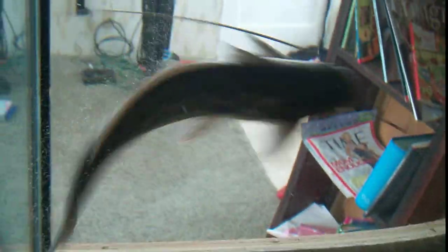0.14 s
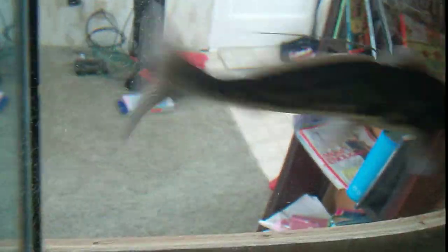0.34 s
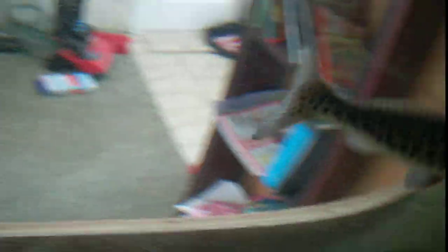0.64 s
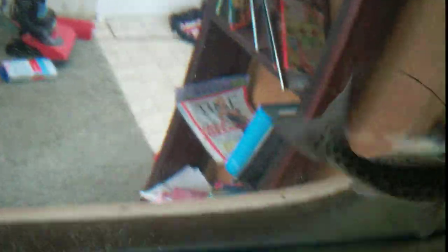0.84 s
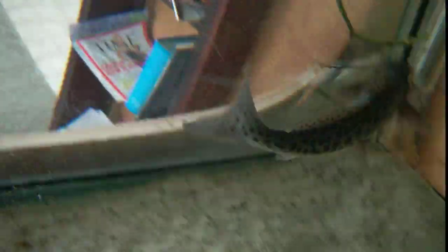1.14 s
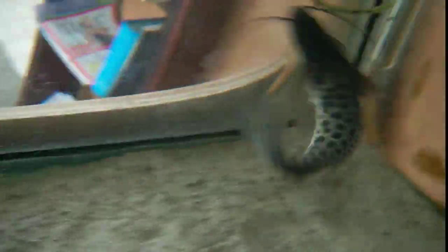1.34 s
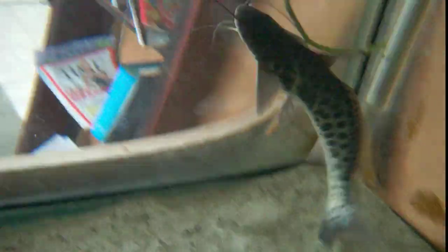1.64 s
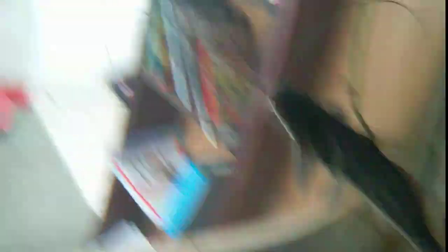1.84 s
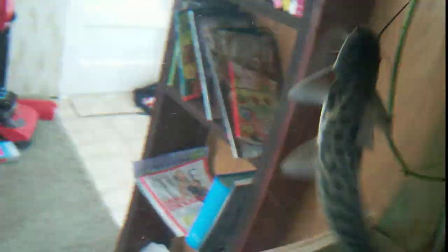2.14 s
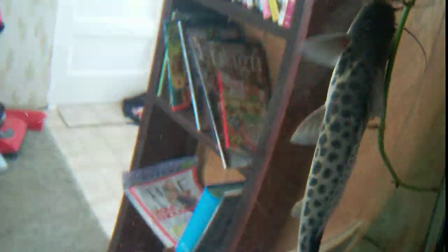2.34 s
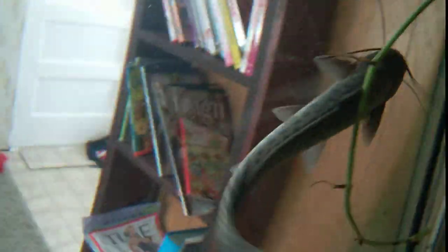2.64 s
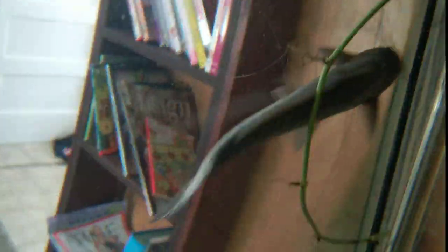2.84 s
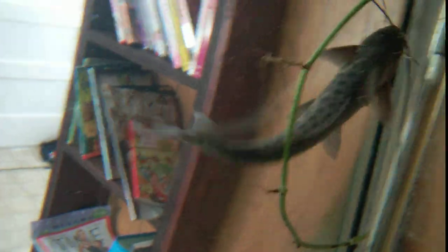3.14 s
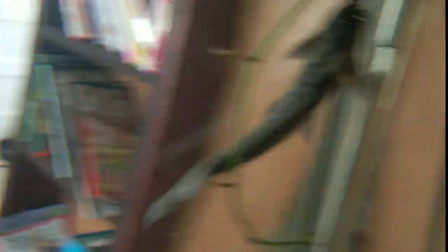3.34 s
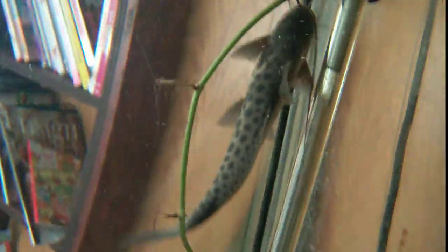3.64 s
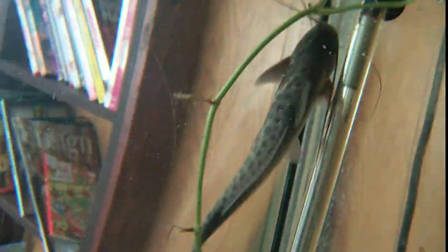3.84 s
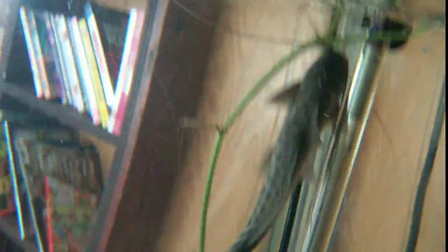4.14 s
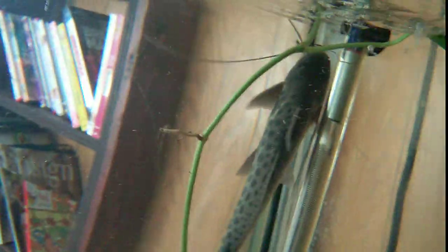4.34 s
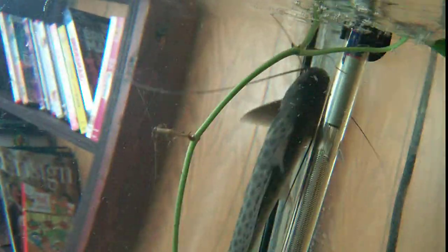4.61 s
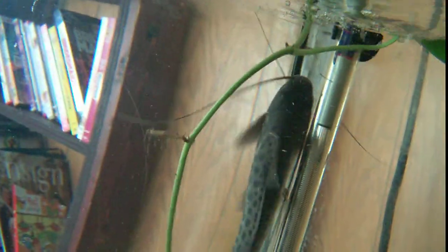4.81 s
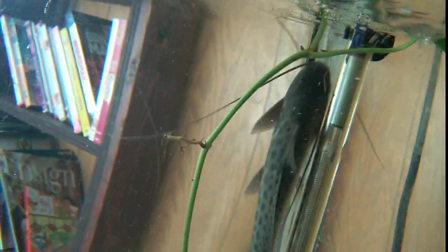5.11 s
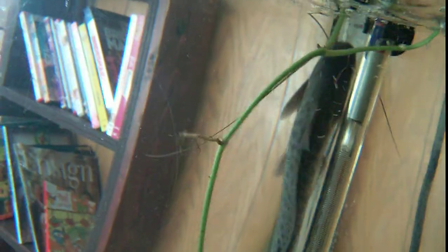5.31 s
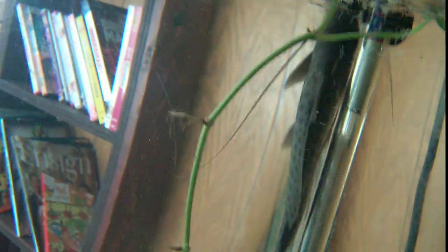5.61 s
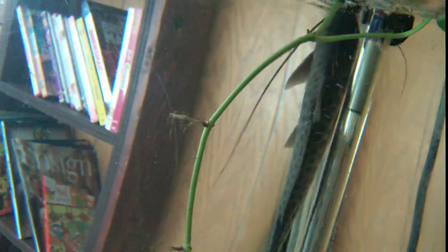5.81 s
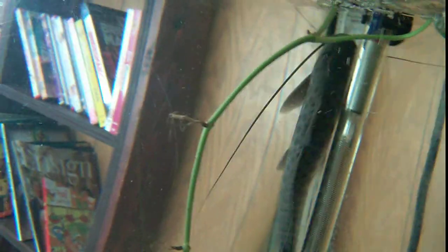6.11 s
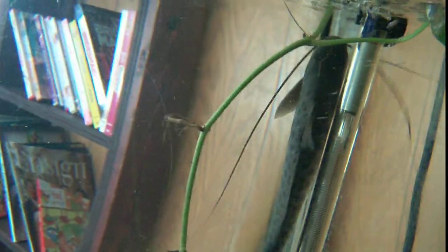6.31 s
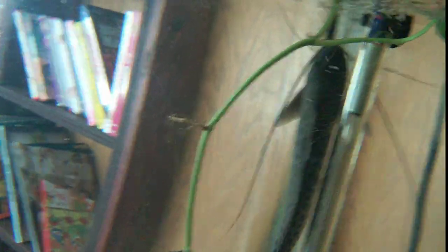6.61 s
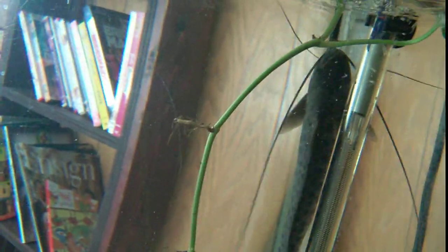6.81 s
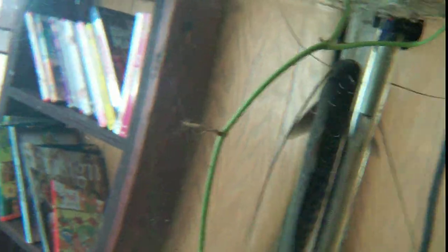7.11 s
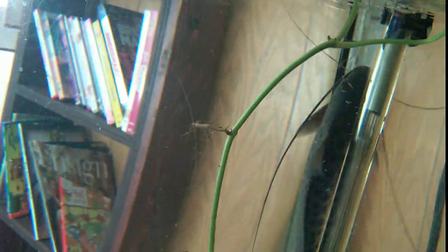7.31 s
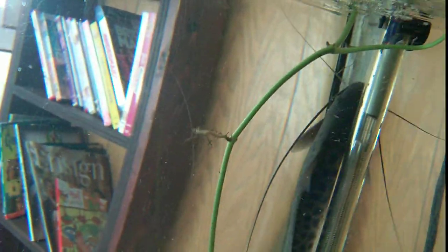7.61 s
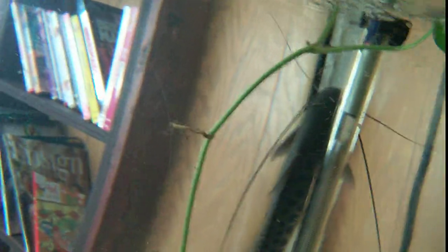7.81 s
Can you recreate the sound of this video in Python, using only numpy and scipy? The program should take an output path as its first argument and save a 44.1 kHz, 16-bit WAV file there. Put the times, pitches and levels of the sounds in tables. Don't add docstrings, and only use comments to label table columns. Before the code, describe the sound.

Heard from a sealed microphone under water in a home aquarium: a loud low mains hum and churning pump water open close by, with resonant glugs and glassy bubble notes. Muffled knocks and low sloshing cluster around one to three seconds. The pump then recedes to a softer hum, leaving sparse plinks and ticks over steady hiss and a thin electronic whine.

```python
import sys
import numpy as np
from scipy import signal
from scipy.fft import rfft, irfft, next_fast_len
from scipy.io import wavfile
from scipy.ndimage import uniform_filter1d

SR = 44100
rng = np.random.default_rng(int(sys.argv[2]) if len(sys.argv) > 2 else 0)


def volts_from_db(level):
    exponent = np.asarray(level, float) / 20
    return 10 ** exponent


def log_audio(samples):
    frames = np.atleast_2d(samples).T
    limited = np.clip(frames, -1, 1)
    pcm = np.round(limited * 32767).astype(np.int16)
    wavfile.write(sys.argv[1], SR, pcm)


N = 351032
TIME = np.arange(N) / SR


def unit(x):
    return x / np.sqrt(np.mean(x ** 2))


def noise(gain_at):
    size = next_fast_len(N)
    hz = np.fft.rfftfreq(size, 1 / SR) + 1e-3
    spectrum = rfft(rng.standard_normal(size)) * gain_at(hz)
    return unit(irfft(spectrum, size)[:N])


def colour(points):
    hz, db = np.transpose(points)
    return lambda f: volts_from_db(np.interp(np.log(f), np.log(hz), db))


def resonances(peaks):
    def gain_at(f):
        power = 0
        for hz, width, db in peaks:
            detuning = (f - hz * hz / f) / width
            power = power + (volts_from_db(db) / (1 + detuning ** 2) ** 0.9) ** 2
        return np.sqrt(power)
    return gain_at


def walk(rate):
    hold = int(SR / rate)
    levels = np.repeat(rng.standard_normal(N // hold + 1), hold)
    slewed = uniform_filter1d(uniform_filter1d(levels, hold), hold)
    return unit(slewed[:N])


def add(out, s, x):
    i = int(round(s * SR))
    out[i:i + len(x)] += x[:N - i]


def preamp_hiss():
    # frequency in Hz, level in dB per Hz.
    hiss_density = [(150, -13), (400, 11), (700, 5), (1360, 4), (2500, 1.5), (4500, -1), (8140, -3.5),
                    (17000, -6.5)]
    return volts_from_db(-41.5) * noise(colour(hiss_density))


def sensor_whine():
    scan_hz, gate_hz = 1966.782, 14.994
    # multiple, level in dB rms.
    scan_lines = [(1, -65), (2, -64), (3, -66), (4, -60), (5, -78), (6, -78), (7, -71), (8, -68)]
    gate = 1 + 0.56 * np.clip(3 * np.cos(2 * np.pi * (gate_hz * TIME + 0.13)), -1, 1)
    whine = np.zeros(N)
    for k, db in scan_lines:
        line = volts_from_db(db) * np.sin(2 * np.pi * k * scan_hz * TIME + k)
        whine += line * gate if k == 4 else line
    return np.sqrt(2) * whine


def slosh():
    # frequency in Hz, level in dB per Hz.
    eddy_density = [(3, -11), (9, 5.5), (25, 2.5), (45, -5.5), (70, -13), (100, -16.5), (200, -75),
                    (500, -100)]
    # time in seconds, slosh level in dB.
    sweep = [(0, -19), (.4, -18), (1.15, -20.5), (1.33, -27), (1.75, -13.5), (1.95, -17.5), (2.35, -15.5),
             (2.81, -18), (3.15, -20.5), (3.3, -16.5), (3.74, -16), (4.41, -24.5), (5.08, -22),
             (5.58, -21.5), (5.96, -23.5), (7.03, -23.5), (7.71, -20), (7.96, -21)]
    sweep_db = np.interp(TIME, *np.transpose(sweep))
    return volts_from_db(sweep_db + 1.82 * walk(5)) * noise(colour(eddy_density))


def knocks():
    # time of the peak in seconds, level in dB, push in ms.
    presses = [(1.5249, -10, 3.9), (1.5978, -16, 2.4), (1.8217, 0.5, 2.64), (1.8247, -15, 2.3),
               (1.917, -7.5, 4.1), (2.0849, -6.5, 3.8), (2.3735, -11, 2.3), (2.787, -12, 3.8),
               (2.7911, -21, 2.1), (4.008, -12.5, 2.6), (4.5082, -19.5, 3.24), (5.321, -24, 2.5),
               (6.33, -21, 2.7), (6.336, -21, 3.3), (6.34, -24, 2.1), (7.3075, -34, 1.4)]
    # time of the peak in seconds, level in dB, push in ms.
    tugs = [
        (1.3517, -3, 3.9),
        (3.3146, -18, 2.6),
        (5.7921, -30, 1.1),
        (6.4854, -25, 1.9),
    ]
    out, t = np.zeros(N), np.arange(1500) / SR
    for direction, rows in ((-0.78, presses), (0.71, tugs)):
        for s, db, push_ms in rows:
            u = t * 1000 / push_ms - 1
            rebound = 0.068 - 0.07 * db
            push = np.exp(-np.abs(u / np.where(u < 0, 0.22, 0.36)) ** 1.4)
            wobble = np.sin(np.pi * np.maximum(u - 0.3, 0)) * np.exp(-np.maximum(u - 0.8, 0))
            add(out, s - push_ms / 1000, direction * volts_from_db(db) * (push - rebound * wobble))
    return out


def tank_response(t):
    # frequency in Hz, level in dB, decay time t60 in seconds.
    low_modes = [(518, 11.5, 0.064), (711, 8, 0.086), (792, -3, 0.15), (890, -0.5, 0.069),
                 (1100, 3.5, 0.093), (1320, 7, 0.051), (1488, 5, 0.071), (1631, 7, 0.043),
                 (1775, -1, 0.057), (1920, -18, 0.083), (2160, 6, 0.05), (2400, 7, 0.043),
                 (2580, -4, 0.04), (2770, -4, 0.063)]
    # frequency in Hz, level in dB, decay time t60 in seconds.
    high_modes = [(2945, -4, 0.027), (3145, 4.5, 0.032), (3410, -1.5, 0.047), (3780, 2.5, 0.036),
                  (3980, 5.5, 0.024), (4320, 5.5, 0.021), (4560, -0.5, 0.036), (4860, -12, 0.041),
                  (5070, 7, 0.026), (5660, 0, 0.025), (5880, 6, 0.019), (6050, -3, 0.016), (6360, 3, 0.02)]
    response = np.zeros(len(t))
    for k, (hz, db, t60) in enumerate(list(low_modes) + list(high_modes)):
        sign = (-1) ** (k * (hz < 2500))
        response += sign * volts_from_db(db) * np.sin(2 * np.pi * hz * t) * 1000.0 ** (-t / t60)
    return response


def fizz():
    per_s, floor_db, spread_db = 60, -60.5, 4
    draws = rng.random((int(per_s * N / SR), 3))
    return [(a * N / SR, floor_db - spread_db * np.log(1 - 0.98 * b), 1800 * 3.54 ** c, 12)
            for a, b, c in draws]


def bubble_events():
    # time in seconds, peak level in dB, pitch in Hz.
    glugs = [(.001, -26, 1340), (.159, -18, 740), (.249, -24.5, 1360), (.514, -21.5, 1060),
             (.62, -38, 1080), (.683, -28.5, 970), (1.512, -33.5, 1300), (1.74, -39, 1160),
             (1.939, -30, 655), (1.963, -31, 711), (2.596, -26.5, 710), (3.448, -40, 1310),
             (3.491, -37, 1070), (4.494, -36, 1190), (5.477, -32, 690), (5.889, -33, 604),
             (6.483, -36, 665), (7.045, -35, 960)]
    # time in seconds, peak level in dB, pitch in Hz.
    plinks = [(.713, -35, 2910), (.874, -31, 3180), (1.326, -25, 2600), (1.361, -32, 3100),
              (1.509, -19, 2770), (1.657, -18.5, 2800), (1.89, -38, 2260), (1.924, -35, 2090),
              (2.2, -32, 2200), (2.654, -28, 2940), (3.238, -33.5, 2700), (3.388, -35, 3600),
              (3.424, -37, 2320), (3.821, -24, 2900), (4.144, -29.5, 3600), (4.474, -30.5, 2900),
              (4.756, -28.5, 2400), (5.193, -29, 2140), (5.371, -30, 2160), (5.456, -34, 2600),
              (5.628, -28, 3150), (5.754, -26, 2150), (6.399, -25.5, 2160), (6.424, -32, 2750),
              (6.595, -28.5, 2880), (6.996, -34, 3260), (7.113, -36, 1920), (7.453, -38, 2220),
              (7.734, -32, 2760), (7.365, -38, 2180)]
    # time in seconds, peak level in dB, pitch in Hz.
    chimes = [(.289, -39, 2080), (.354, -14, 1665), (.732, -38, 1770), (.774, -34, 2440), (.955, -37, 2470),
              (1.325, -27, 3145), (1.362, -14.5, 2334), (1.938, -37, 3020), (1.972, -33.5, 3710),
              (2.088, -37, 2530), (2.135, -22, 2305), (2.476, -37, 3300), (2.778, -22, 2210),
              (3.556, -33.5, 2840), (3.708, -32.5, 2380), (4.023, -23.5, 3490), (4.404, -38, 1775),
              (4.607, -35, 3070), (4.876, -36, 3070), (6.16, -33.5, 2390), (6.315, -25, 3170),
              (7.162, -35, 2880), (7.189, -35, 2570), (7.525, -38, 2890), (7.86, -35, 2260),
              (1.06, -39, 6500), (2.823, -39, 4250), (4.007, -43, 2700), (4.625, -40, 1410),
              (6.842, -39, 5360)]
    # time in seconds, peak level in dB, pitch in Hz.
    ticks = [(.6, -35, 4430), (.659, -29, 4560), (1.525, -25.5, 5940), (2.036, -36, 6050),
             (2.29, -30, 5900), (3.106, -34, 5800), (3.159, -30.5, 3780), (3.276, -33, 4900),
             (3.461, -30.5, 5440), (3.928, -36, 4530), (3.944, -25, 4100), (4.007, -36, 6250),
             (4.007, -35, 4250), (4.109, -34, 4900), (4.206, -35, 4240), (4.506, -35, 5800),
             (4.727, -31, 5960), (4.998, -35, 5900), (5.974, -35, 6330), (6.043, -38, 4490),
             (6.045, -37, 6200), (6.14, -40, 4550), (6.225, -26.5, 6100), (6.996, -35, 4700),
             (7.088, -38, 5170), (7.114, -28, 5300), (7.62, -35, 5880), (7.647, -34, 3820),
             (6.554, -39, 5070), (7.188, -40, 5090)]
    # time in seconds, peak in dB, pitch in Hz, cycles of ring.
    pops = [(.353, -13.5, 810, 1.3), (.354, -24.5, 2550, 3.2), (.468, -25, 725, 2.8),
            (.468, -30, 1780, 2.9), (.998, -26, 1450, 3.6), (1.765, -23, 5500, 3.9),
            (1.821, -39, 1000, 1.5), (1.962, -25.5, 1140, 0.67), (2.092, -34, 910, 1.4),
            (2.29, -32, 3690, 3.7), (2.55, -30, 620, 3.1), (3.314, -39, 930, 1.4), (3.694, -32, 880, 4.8),
            (4.007, -26.5, 1350, .7), (4.571, -29.5, 1100, 1.6), (4.935, -30, 5200, 4.2),
            (5.048, -29.5, 2820, 3.7), (6.105, -28.5, 1940, 3.3), (6.328, -29, 1320, 1.1),
            (6.829, -36, 1600, 1.7)]
    # time in seconds, peak in dB, pitch in Hz,
    # cycles of ring.
    pings = [(0.003, -28, 2350, 5), (0.16, -17, 880, 9), (0.356, -24, 1085, 6), (0.47, -25, 2350, 7),
             (0.471, -23, 1680, 8), (0.633, -7.5, 770, 11), (1.51, -27, 2400, 12), (1.671, -36, 4700, 12),
             (4.404, -30, 2160, 10), (4.93, -37, 3900, 6), (5.195, -34, 2430, 20), (5.298, -39, 2180, 18),
             (5.485, -37, 711, 20), (5.649, -40, 3750, 18), (5.754, -31, 2830, 14), (5.755, -26, 2420, 25),
             (6.223, -40, 3170, 20), (6.335, -38, 3850, 14), (6.495, -35, 711, 22), (6.553, -36, 5900, 16),
             (6.593, -35, 3145, 16), (7.677, -40, 6410, 20), (7.735, -34, 2400, 18)]
    events = list(pops) + list(pings) + fizz()
    for rows, cycles in ((glugs, 9.4), (plinks, 12.4), (chimes, 36), (ticks, 15.3)):
        events += [(*row, cycles) for row in rows]
    return events


def bubbles():
    size = 8192
    t = np.arange(size) / SR
    tank, out = rfft(tank_response(t)), np.zeros(N)
    for s, db, hz, cycles in bubble_events():
        decay = np.exp(-np.pi * hz * t / (0.76 * cycles))
        onset = 1 - np.exp(-t * hz / 1.95)
        ring = np.sin(2 * np.pi * hz * t) * decay * onset
        direct = volts_from_db(22) / cycles
        heard = irfft(rfft(ring) * (tank + direct))[:size // 2]
        add(out, max(s - 1.4 / hz, 0), heard * volts_from_db(db) / np.abs(heard).max())
    return out


def motor_hum(near_db):
    mains_hz, rest_db = 60.01, -31.5
    lag = 1.2
    # multiple, level in dB, extra level when close in dB.
    mains_lines = [(1, -0.5, -3), (2, 0, 0), (3, -10, 5), (4, -16, 3.5), (5, -23, -3), (6, -21, -13),
                   (8, -60, -18)]
    gain_db = 0.92 * near_db
    close = np.clip(gain_db / 10, 0, 1)
    hum = np.zeros(N)
    for k, db, extra_db in mains_lines:
        level = volts_from_db(db + extra_db * close + 1.3 * walk(2.216))
        hum += level * np.cos(2 * np.pi * k * mains_hz * TIME + lag * k * k)
    return -np.sqrt(2) * volts_from_db(rest_db + gain_db) * hum


def churned_water(near_db):
    # frequency in Hz, width in Hz, level in dB.
    low_casing = [(140.7, 21, 3), (155.6, 74, -4), (223, 115, -10), (288, 50, -4), (329, 65, -10.5)]
    # frequency in Hz, width in Hz, level in dB.
    high_casing = [(444.4, 31, 3), (500, 28, 1), (565, 70, -3), (642, 33, -0.5), (716, 29, -4.5),
                   (813, 86, -12.5), (1000, 200, -16.5)]
    low = volts_from_db(-35.5 + near_db + 1.3 * walk(10)) * noise(resonances(low_casing))
    high = volts_from_db(-50 + 1.61 * near_db + 1.6 * walk(18)) * noise(resonances(high_casing))
    return low + high


def pump():
    # time in seconds, nearness in dB.
    nearness = [(0, 10.5), (.4, 11), (.73, 8), (1.1, 3.5), (1.33, 5), (1.9, 3.5), (2.35, 3.5), (3.0, -1),
                (3.6, 0), (4.4, -1.5), (5.1, -2), (5.7, -0.5), (6.2, -1), (6.7, -0.5), (7.1, -1.5),
                (7.6, 1), (7.96, 0)]
    near_db = np.interp(TIME, *np.transpose(nearness))
    return motor_hum(near_db) + churned_water(near_db)


def scene():
    circuits = preamp_hiss() + sensor_whine()
    return (circuits + slosh() + knocks() + bubbles() + pump())[None]


def band_limit(x):
    return signal.sosfilt(signal.butter(12, 16880, fs=SR, output="sos"), x)


def record(dry):
    low_pass = signal.ellip(10, 0.1, 60, 15790, fs=SR, output="sos")
    cut = signal.sosfilt(low_pass, dry)
    return band_limit(cut)


dry = scene()
out = record(dry)
log_audio(out)
```